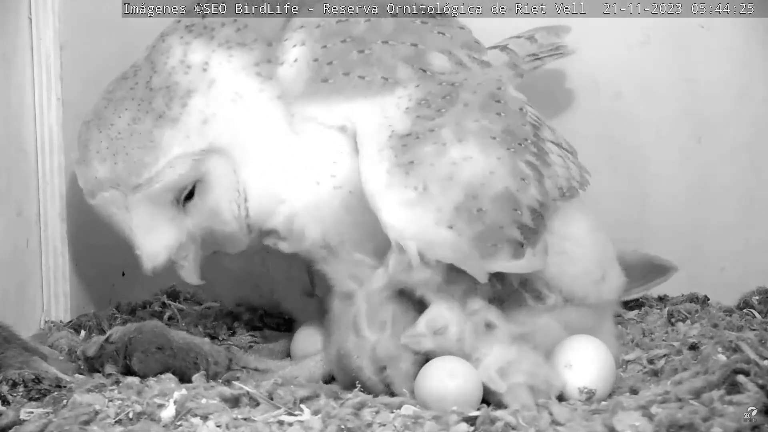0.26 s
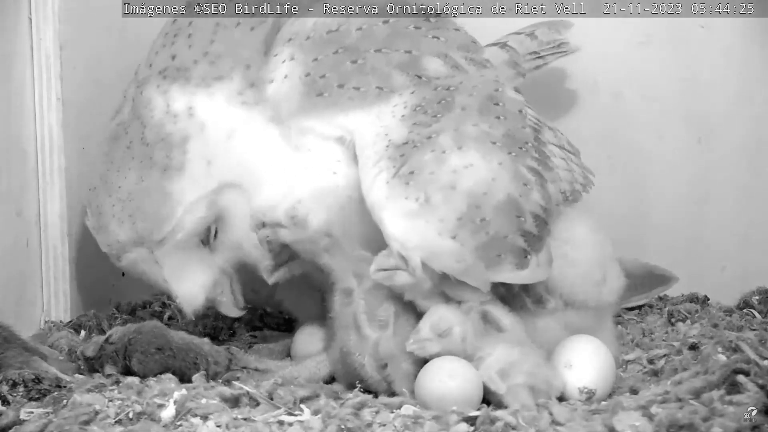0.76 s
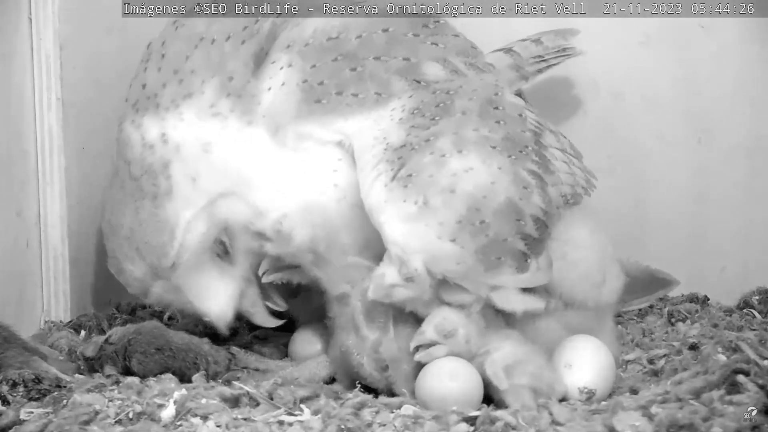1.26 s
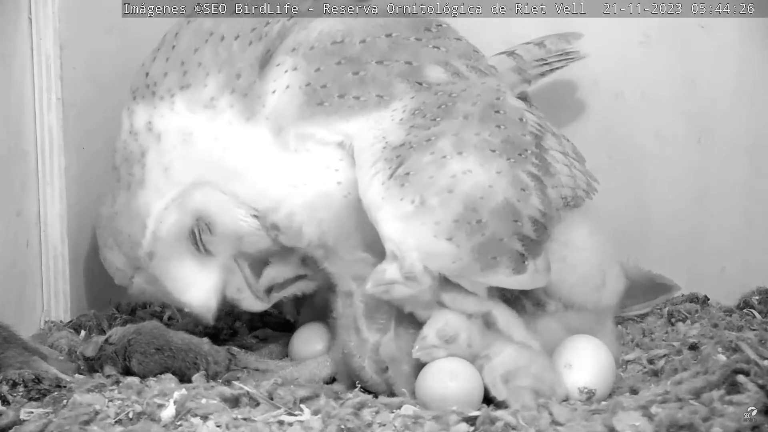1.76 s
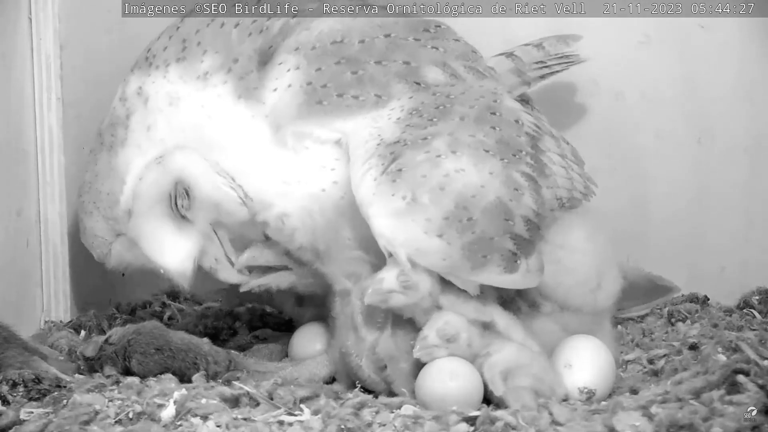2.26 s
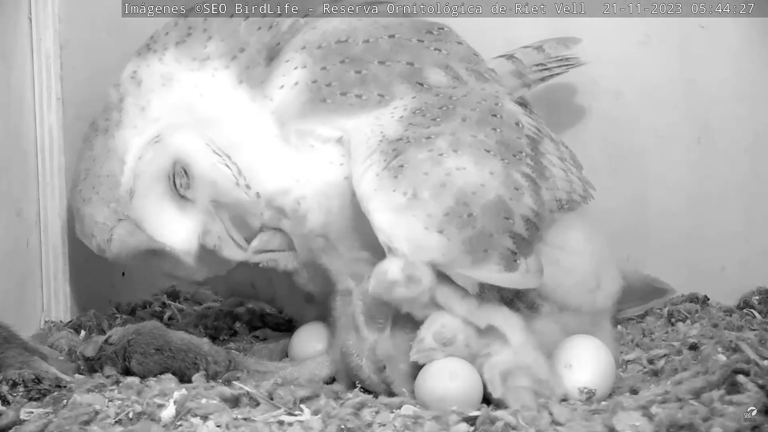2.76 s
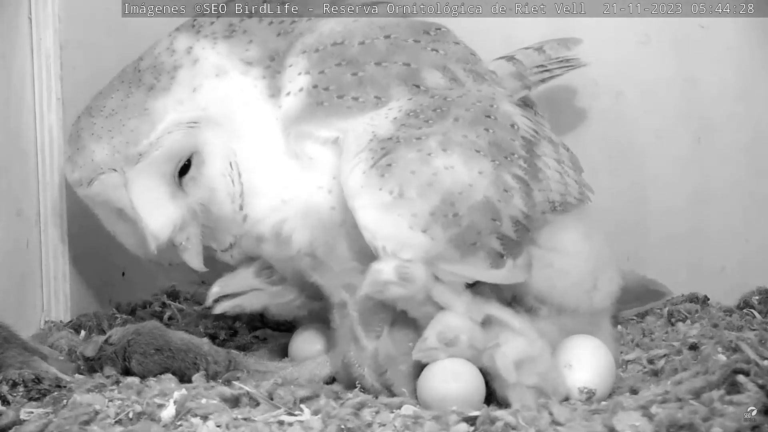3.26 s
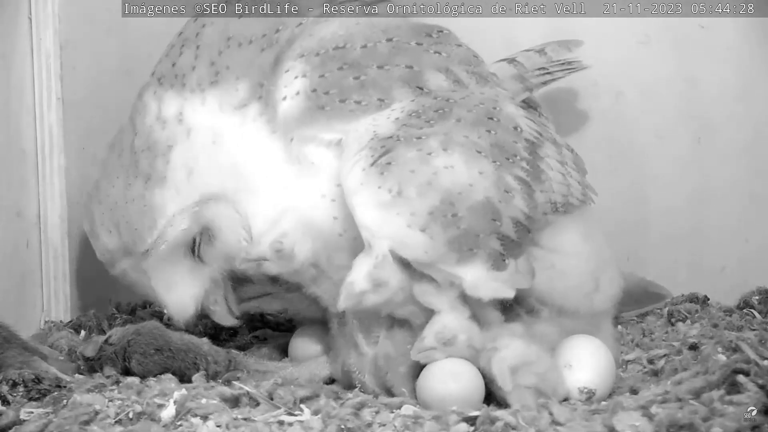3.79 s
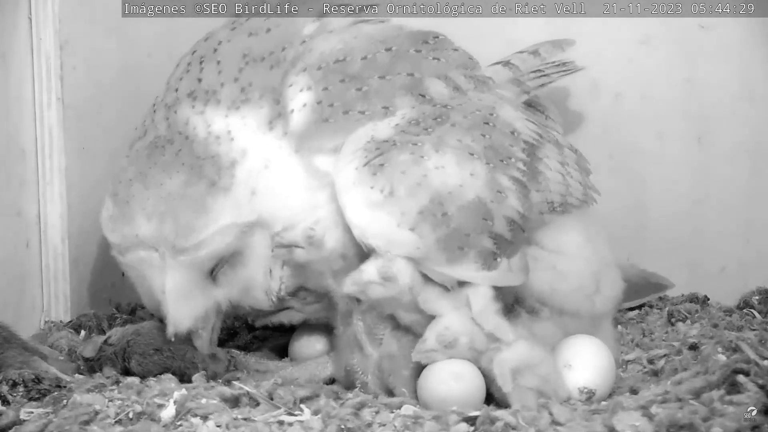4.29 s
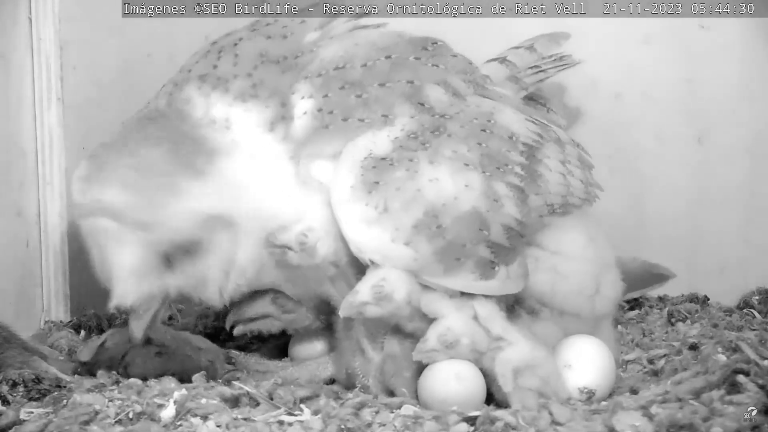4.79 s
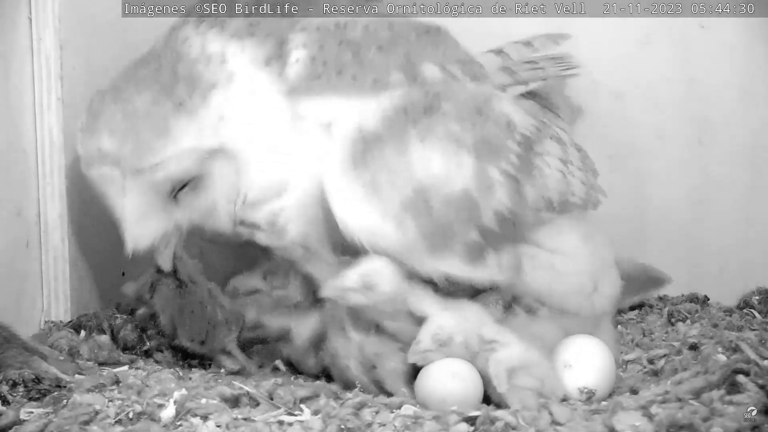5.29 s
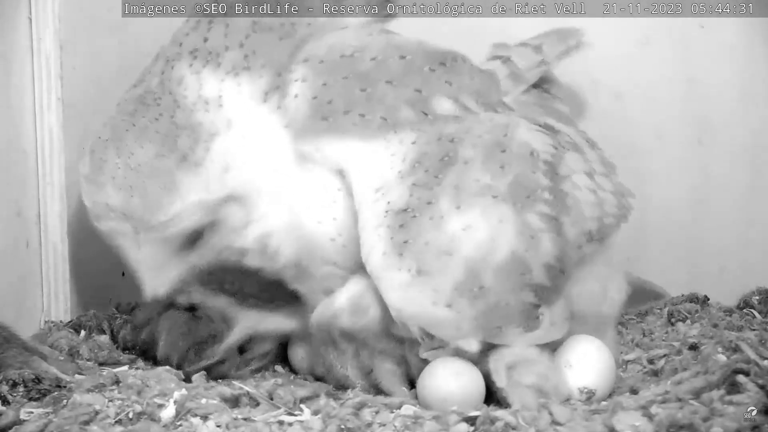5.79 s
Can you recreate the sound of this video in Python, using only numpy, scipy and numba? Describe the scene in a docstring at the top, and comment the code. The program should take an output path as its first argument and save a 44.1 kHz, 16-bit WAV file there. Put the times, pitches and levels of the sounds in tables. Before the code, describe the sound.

Young barn owls and an adult in a wooden nest box, close to a camera microphone, with steady 50-hertz hum and faint amplifier hiss throughout. A hiss and a bright rasp are already under way at the start, fading by about 0.4 seconds. Only hum remains until 1.2, when a rough, fluttering rasp swells and fades, with a falling squeak and small click near 1.7. At 2.35 a tiny squeak leads into a smooth, full hiss lasting until 2.9. Around 3.4 the hum surges into a soft, low buzzing thump of about 0.2 seconds. A quieter, rougher rasp follows from 3.65 to 4.05, squeaking at both ends. Faint clicks at 4.5 precede a softer hiss until 5.1. The hum eases slightly; tiny clicks come at 5.7, and a final rasp opens with a squeak at 5.97, cut short almost immediately.

```python
"""Young barn owls in a wooden nest box, heard close to a camera microphone over mains hum and amplifier noise.
A hiss and a rasp are already sounding; a rasp with squeaks near its end and a full hiss led by a squeak follow.
The hum swells into a soft buzzing thump, then come a rasp squeaking at start and end, a hiss and small clicks.
A last rasp opens with a squeak and is cut short. Calls are fluttering noise ringing throat and beak;
squeaks are gliding tones, clicks are noise bursts, and the box colours them all."""
import sys
import numpy as np
from scipy import signal
from scipy.fft import rfft, irfft
from scipy.io import wavfile
from scipy.ndimage import uniform_filter1d
from numba import njit

SR = 44100
rng = np.random.default_rng(int(sys.argv[2]) if len(sys.argv) > 2 else 0)


def store_pcm(level_fs):
    """Save levels as 16-bit WAV."""
    pcm = np.round(np.clip(level_fs, -1, 1) * 32767).astype(np.int16)
    wavfile.write(sys.argv[1], SR, np.atleast_2d(pcm).T)


N = 266364
T = np.arange(N) / SR

# Amplifier noise colour. Each row: frequency in Hz, relative density in dB per Hz.
NOISE_COLOUR = [(25, 16.5), (100, 12), (250, 8), (500, 5.5), (1000, 2.5), (2000, 0), (3500, -2), (5000, -4),
                (6200, -7), (7200, -11), (8000, -18)]
MAINS_HZ = 50
# Partials of the hum. Each row: multiple of the mains frequency, relative level in dB.
HUM_PARTIALS = [(1, 0), (2, -29.5), (3, -10.5), (4, -24.5), (5, -23.5), (6, -27.5), (7, -27.5), (8, -33),
                (9, -26.5), (10, -41), (11, -26), (13, -26.5), (15, -32.5)]
# Slow drift of the hum. Each row: time in seconds, rms level in dB.
HUM_LEVEL = [(0, -49.5), (.23, -49.5), (.29, -47.5), (.34, -49.3), (3.3, -49), (3.7, -51.3), (5.3, -51),
             (5.4, -53), (6.04, -53.5)]
# Partials of the buzzing thump. Each row: multiple of the mains frequency, relative level in dB.
BUZZ_PARTIALS = [(1, 2.5), (2, -6), (3, -12), (4, -36), (5, -14.5), (6, -22), (7, -23.5), (8, -26.5),
                 (9, -26), (13, -35)]
# Surges of the hum. Each row: start in seconds, length in seconds, rms level at full swell in dB.
HUM_SURGES = [(3.394, .148, -42), (3.551, .04, -41)]
SURGE_EDGE_S = .012
# Clicks of beak and bedding, and one small puff of breath (the row at 1.722 s). Each row: start in seconds,
# level in dB, centre in Hz, width in Hz, # decay time in seconds.
CLICKS = [(1.713, -43, 4500, 3500, 0.0025), (1.722, -46, 3240, 3970, 0.008),
          (4.475, -51, 3000, 1500, 0.0042), (4.490, -61, 2880, 1200, 0.013),
          (5.722, -56.5, 2800, 1200, 0.0074), (5.738, -59, 2800, 1200, 0.0083)]
# Squeaks. Each row: start in seconds, length in seconds, start pitch in Hz, end pitch in Hz, level in dB,
# octave against the note in dB.
SQUEAKS = [(1.666, 0.0276, 2570, 2030, -42.5, -12), (1.717, 0.024, 2640, 2510, -53.5, 3),
           (2.345, 0.018, 3370, 2540, -52.5, -18), (3.659, 0.016, 2680, 2810, -57, -22),
           (4.051, 0.011, 2310, 2170, -50.5, 3.5), (5.97, 0.066, 2950, 3170, -50, -20)]

# Resonances of each call: first the throat, then the beak, then those that stay put.
# Each row: centre before any glide in Hz, filter width in Hz, relative level in dB.
RASP_THROATS = [[(3240, 760, 2), (4920, 1800, -2), (1220, 470, -12.5), (6600, 1940, -15.5)], [(3150, 2060, 0.5), (4640, 1300, -0.5), (1190, 2800, -15),
                                        (5720, 2800, -6.5), (2370, 680, -2.5)], [(3020, 870, 5.5), (4640, 1500, 0.5),
                                                               (2040, 2000, -7), (6270, 4000, -13)], [(2980, 800, 2),
                                                                                      (4900, 1600, -3),
                                                                                      (1490, 5000, -10.5),
                                                                                      (6100, 1500, -16)]]
HISS_THROATS = [[(2505, 1100, 1.5), (5060, 1900, -2), (910, 1600, -7.5), (6870, 870, -11),
                 (3820, 1300, -12.5)], [(2455, 740, 1), (4740, 1400, -7), (926, 1800, -11.5),
                                        (6780, 630, -17), (4030, 1100, -12.5)], [(2320, 1060, 0.5), (5500, 820, -9),
                                                               (840, 1050, -5), (5620, 1030, -7),
                                                               (3820, 1300, -21)]]
TREBLE_FROM_HZ = 3500  # resonances from here up are the treble of a call, those below its body

# Rasps. Each row: start in seconds, length in seconds, time of greatest effort as a share of the length,
# body level there in dB, swell up to it in dB, treble against the body there in dB, treble swell in dB,
# throat shift there in semitones, flutter in Hz, roughness from 0 to 1.
RASPS = [(-.3, 0.44, 0.54, -39.5, 15, 9.5, 8, .4, 313, 0.34),
         (1.192, 0.5234, 0.51, -39, 16, 3, 4.5, 0.33, 336.6, .33),
         (3.663, 0.397, 0.76, -46.5, 5, -0.9, 11.5, 0.74, 222, 0.64),
         (5.971, 0.54, 0.34, -44, 9.5, -1.2, 1.5, 1.4, 233, 0.3)]
RASP_ATTACK_S, RASP_RELEASE_S = 0.007, 0.052
END_SLACK = 0.49  # slackness at the end, before squaring; the start is 1
SLACK_SEMITONES = -2  # the throat sits lower at least effort

# Hisses. Each row: start in seconds, length in seconds, attack time constant in seconds, release in seconds,
# body level at full pressure in dB, treble against the body in dB, treble fade over the call in dB
# (negative brightens), throat drift over the call in semitones, beak shift in the first half in semitones,
# flutter in Hz, roughness from 0 to 1.
HISSES = [(-.12, .53, 0.086, 0.12, -39, 0.5, -3.5, -2.7, -0.5, 328, 0.08),
          (2.356, 0.58, 0.073, 0.12, -38, -1, -2.5, -0.026, 1, 296.5, 0.05),
          (4.562, 0.558, 0.06, 0.097, -42.5, -2.5, 1.5, 0.86, -3, 287, 0.1)]
OPENING_TREBLE_DB = 6.5  # extra treble while the pressure still builds
CLOSING_TREBLE_DB, CLOSING_SEMITONES = -13.5, -2.1  # a hiss dulls and sinks as the throat closes
BEAK_MOVE_S = .06  # the beak changes its opening around halfway through a hiss

# Standing waves of the box, peaks and nulls at the microphone.
# Each row: centre in Hz, nominal width in Hz, boost or cut in dB.
BOX_MODES = [(538, 50, 8), (645, 35, 4), (790, 45, 4), (857, 40, -11), (965, 60, 3), (1080, 90, 4.5),
             (1168, 92, -10), (1330, 45, 4), (1555, 90, 3), (1690, 25, -3), (2235, 130, 3.5),
             (2343, 55, -6), (2765, 70, 3), (2895, 50, 2), (3350, 80, -11), (3452, 35, 7), (3655, 45, 3),
             (4120, 35, 4), (4175, 35, -7), (4280, 60, 3), (4645, 50, 2), (4800, 55, 3), (5460, 45, 3),
             (5560, 60, -3), (6150, 45, 5), (6360, 60, -4), (7230, 170, 5)]
TOP_HZ = 7850  # upper limit of the camera sound


def undb(db):
    """Decibels to gain."""
    return 10 ** (np.asarray(db) / 20)


def unit(x):
    """Scale to rms 1."""
    return x / np.sqrt(np.mean(x ** 2) + 1e-20)


def span(start, end):
    """Sample numbers between two times, kept within the scene."""
    return np.arange(max(int(start * SR), 0), min(int(end * SR), N))


def gate(t, length, attack, release):
    """Rises at time 0, holds, and has fallen again after the length."""
    return np.clip(np.minimum(t / attack, (length - t) / release), 0, 1)


@njit
def bandpass(x, hz, width):
    """State-variable band-pass with a moving centre and a gain of 1 there."""
    y, band, low = np.empty(len(x)), 0., 0.
    for i in range(len(x)):
        g, damping = np.tan(np.pi * hz[i] / SR), width / hz[i]
        v = (band + g * (x[i] - low)) / (1 + g * (g + damping))
        band, low = 2 * v - band, low + 2 * g * v
        y[i] = damping * v
    return y


def resonate(x, hz, width):
    """A resonance with steep skirts: the same band-pass twice."""
    centre = hz * np.ones(len(x))
    once = bandpass(x, centre, float(width))
    return bandpass(once, centre, float(width))


def amplifier(noise_db=-61.0):
    """Smooth electronic noise, strongest in the bass."""
    hz, db = np.transpose(NOISE_COLOUR)
    bins = np.linspace(0, SR / 2, N // 2 + 1)
    colour = undb(np.interp(np.log(bins + 1), np.log(hz), db))
    noise = irfft(rfft(rng.standard_normal(N)) * colour, N)
    return undb(noise_db) * unit(noise)


def mains(partials, smear):
    """One pulse for each mains cycle, rounded off because the higher partials arrive out of step."""
    phase = 2 * np.pi * MAINS_HZ * T - np.pi / 2
    return unit(sum(undb(db) * np.cos(round(k) * phase - smear * (k - 1) ** 2) for k, db in partials))


def hum():
    """Mains pick-up of slowly drifting level, which surges for a moment into a buzzing thump."""
    seconds, db = np.transpose(HUM_LEVEL)
    level = undb(np.interp(T, seconds, db))
    surge = 0
    for start, length, surge_db in HUM_SURGES:
        surge = surge + undb(surge_db) * gate(T - start, length, SURGE_EDGE_S, SURGE_EDGE_S)
    return -level * mains(HUM_PARTIALS, smear=0.123) - surge * mains(BUZZ_PARTIALS, smear=0.048)


def clicks():
    """Tiny knocks and scrapes of beak and bedding, and a small puff of breath: band-passed noise that dies at
    once."""
    out = np.zeros(N)
    for start, db, hz, width, decay in CLICKS:
        i = span(start, start + 0.14)
        grain = unit(resonate(rng.standard_normal(len(i)), hz, width))
        out[i] += undb(db) * np.exp(-(T[i] - start) / decay) * grain
    return out


def squeaks(waver=0.14):
    """The throat briefly sings a gliding, unsteady note with its octave."""
    out = np.zeros(N)
    for start, length, start_hz, end_hz, db, octave_db in SQUEAKS:
        i = span(start, start + length)
        # smoothing over 40 samples also shrinks the waver
        wobble = uniform_filter1d(rng.standard_normal(len(i)), size=40)
        hz = np.linspace(start_hz, end_hz, len(i)) * (1 + waver * wobble)
        phase = 2 * np.pi * np.cumsum(hz) / SR
        note = np.sin(phase) + undb(octave_db) * np.sin(2 * phase)
        out[i] += undb(db) * signal.windows.tukey(len(i), .7) * note
    return out


def flutter(count, rate_hz, depth, jitter=.3, scatter_db=1.0, open_share=0.32):
    """Membranes in the throat flap unevenly and chop the air into puffs."""
    chance = rng.standard_normal((1000, 2))
    edges = np.cumsum(np.exp(jitter * chance[:, 0])) / rate_hz
    cycle = np.interp(np.arange(count) / SR, edges - edges[0], np.arange(len(edges)))
    puff_gain = undb(scatter_db * chance[cycle.astype(int), 1])
    puffs = unit(np.exp(-(cycle % 1) / open_share) * puff_gain)
    depth = np.clip(depth, 0, 1)
    return unit(1 - depth + depth * puffs)


def wall_echoes(x, echo_db=-7, count=10, first_s=0.001488, last_s=.016, low_hz=1500):
    """Each call has its own handful of echoes from the walls, which comb the treble."""
    chance = rng.random((count, 2))
    delays = (first_s + (last_s - first_s) * chance[:, 0]) * SR
    # later echoes are weaker; each one is upright or inverted by chance
    sizes = np.sign(chance[:, 1] - .5) * np.exp(-chance[:, 0])
    taps = np.bincount(delays.astype(int), sizes / np.linalg.norm(sizes))
    treble = signal.sosfilt(signal.butter(2, low_hz, "high", fs=SR, output="sos"), x)
    echoes = signal.fftconvolve(treble, taps)[:N]
    return (x + undb(echo_db) * echoes) / np.hypot(1, undb(echo_db))


def call(i, throat, gain, treble_db, shifts, flutter_hz, rough):
    """Chopped, turbulent air rings throat and beak; their resonances glide (semitones) as the bird moves them."""
    air = flutter(len(i), flutter_hz, rough)
    body, treble = 0, 0
    for k, (hz, width, db) in enumerate(throat):
        glide = 2 ** (shifts[k] / 12) if k < 2 else 1
        turbulence = air * rng.standard_normal(len(i))
        ring = undb(db) * resonate(turbulence, hz * glide, width)
        if hz < TREBLE_FROM_HZ:
            body = body + ring
        else:
            treble = treble + ring
    out = np.zeros(N)
    out[i] = gain * (unit(body) + undb(treble_db) * unit(treble))
    return wall_echoes(out)


def rasps():
    """Thinner, rougher begging calls: one arch of effort makes each louder, brighter and higher."""
    out = np.zeros(N)
    for row, throat in zip(RASPS, RASP_THROATS):
        start, length, crest, db, swell_db, treble_db, treble_swell_db, shift, flutter_hz, rough = row
        i = span(start, start + length)
        t = T[i] - start
        slack = np.interp(t / length, [0, np.clip(crest, 0, 1), 1], [1, 0, END_SLACK]) ** 2
        gain = undb(db - swell_db * slack) * gate(t, length, RASP_ATTACK_S, RASP_RELEASE_S)
        bright_db = treble_db - treble_swell_db * slack
        throat_glide = shift + SLACK_SEMITONES * slack
        out += call(i, throat, gain, bright_db, (throat_glide, 0), flutter_hz, rough)
    return out


def hisses():
    """Long, smooth, full hisses: the pressure builds and holds, then the throat closes."""
    out = np.zeros(N)
    for row, throat in zip(HISSES, HISS_THROATS):
        start, length, attack, release, db, treble_db, fade_db, drift, beak_shift, flutter_hz, rough = row
        i = span(start, start + length)
        t = T[i] - start
        progress = t / length - .5  # -0.5 at the start, 0.5 at the end
        opening = np.exp(-t / attack)
        closing = np.clip(1 - (length - t) / release, 0, 1)
        pressure = (1 - opening) * (1 - closing ** 2)
        bright_db = treble_db - fade_db * progress + OPENING_TREBLE_DB * opening + CLOSING_TREBLE_DB * closing
        throat_glide = drift * progress + CLOSING_SEMITONES * closing
        beak_glide = beak_shift * (1 - np.tanh((t - length / 2) / BEAK_MOVE_S)) / 2
        gain = undb(db) * pressure
        out += call(i, throat, gain, bright_db, (throat_glide, beak_glide), flutter_hz, rough)
    return out


def nest_box(x):
    """Standing waves between the close walls lift and cancel narrow bands."""
    for hz, width, db in BOX_MODES:
        half = undb(db / 2)  # sharpens boosts and broadens cuts
        x = x + (half ** 2 - 1) * bandpass(x, np.full(N, float(hz)), float(width / half))
    return x


def scene():
    """One microphone in the box feeds both channels; hum and noise bypass the box."""
    birds = hisses() + rasps() + squeaks() + clicks()
    mono = nest_box(birds) + hum() + amplifier()
    return np.array([mono, mono])


def record(dry):
    """The camera cuts the treble off steeply above its upper limit."""
    return signal.sosfilt(signal.ellip(10, .2, 80, TOP_HZ, fs=SR, output="sos"), dry)


dry = scene()
out = record(dry)
store_pcm(out)
```